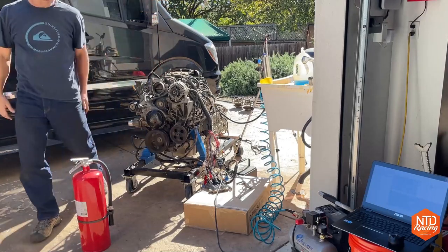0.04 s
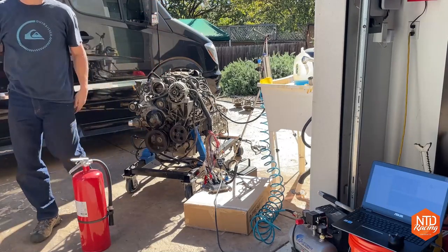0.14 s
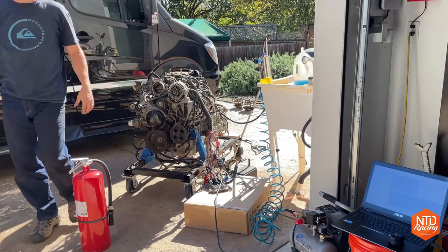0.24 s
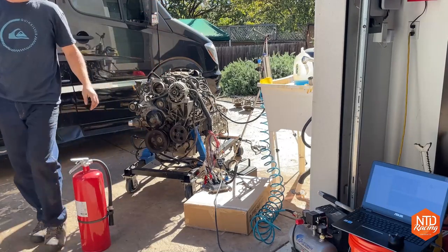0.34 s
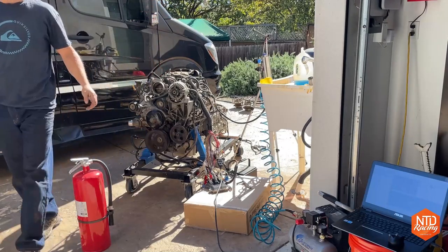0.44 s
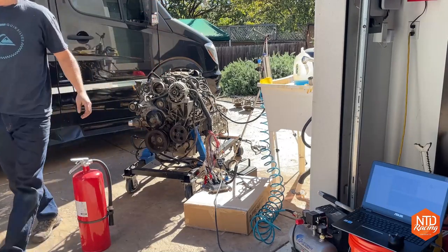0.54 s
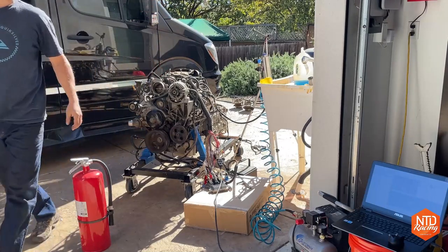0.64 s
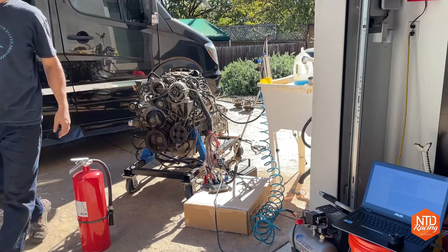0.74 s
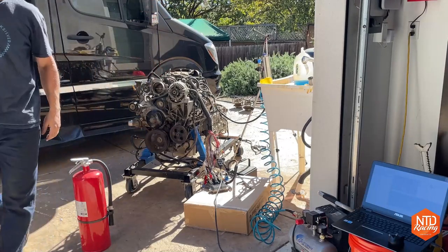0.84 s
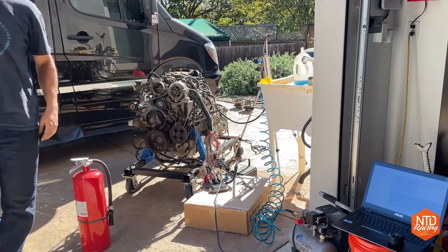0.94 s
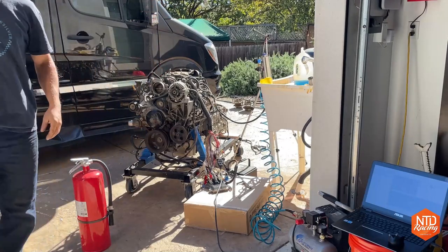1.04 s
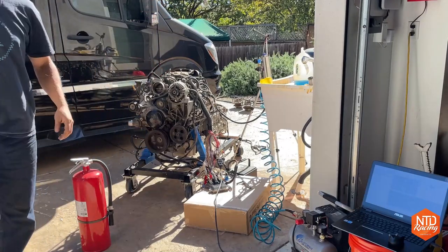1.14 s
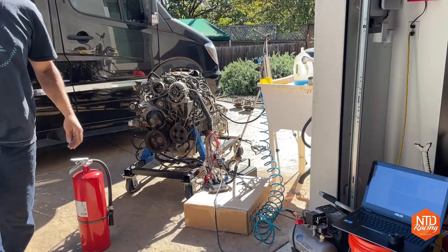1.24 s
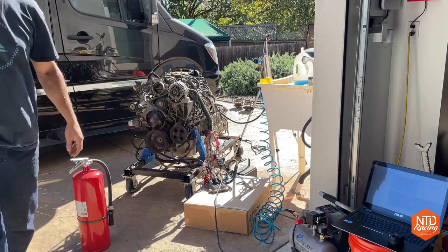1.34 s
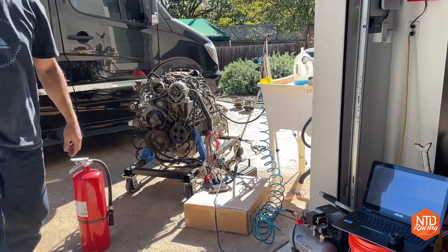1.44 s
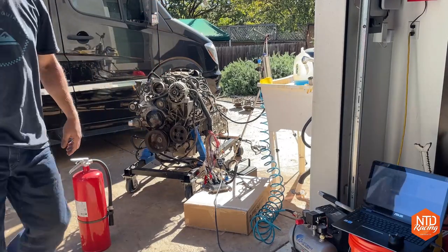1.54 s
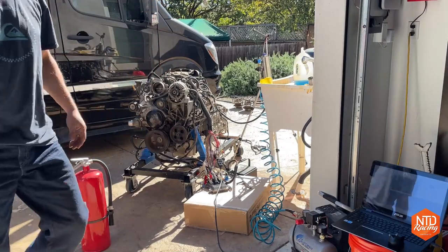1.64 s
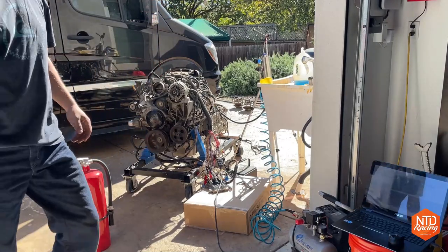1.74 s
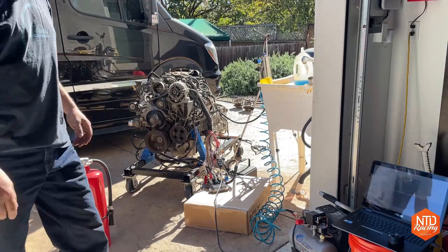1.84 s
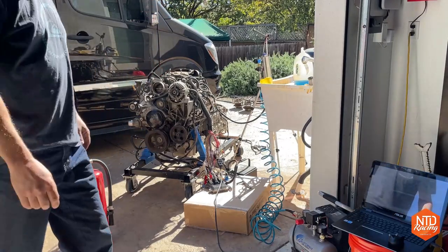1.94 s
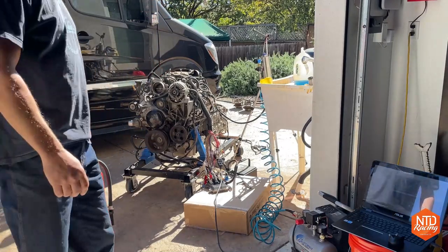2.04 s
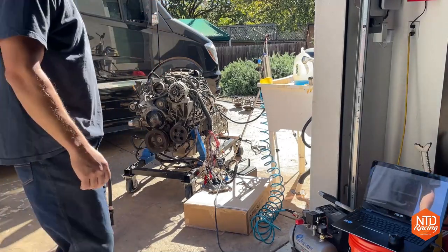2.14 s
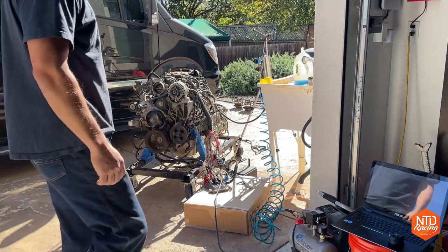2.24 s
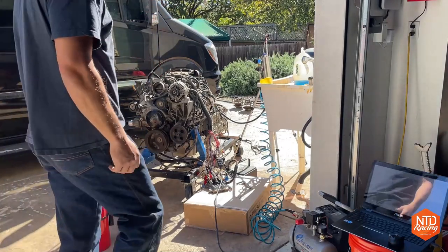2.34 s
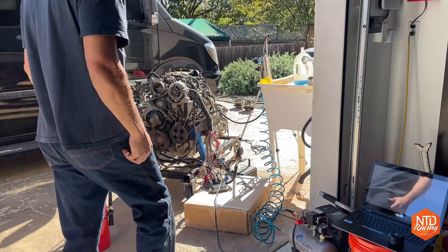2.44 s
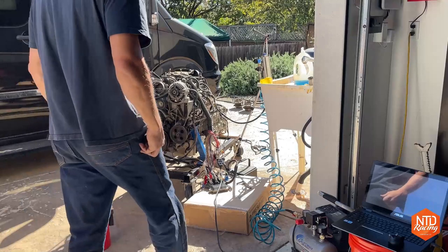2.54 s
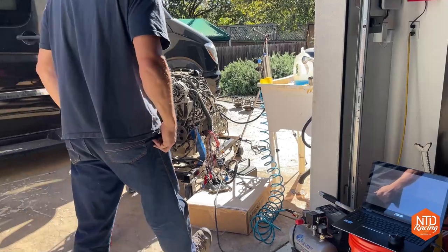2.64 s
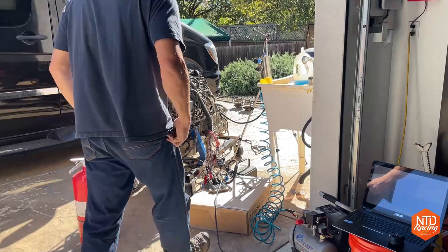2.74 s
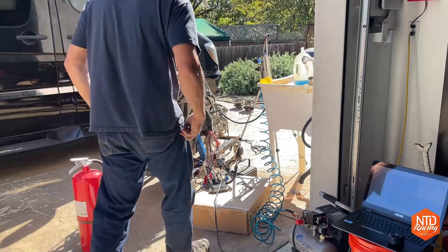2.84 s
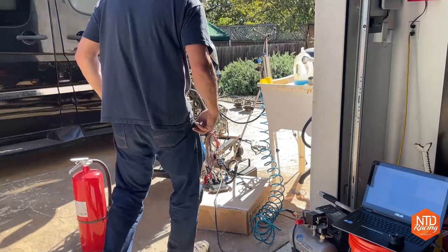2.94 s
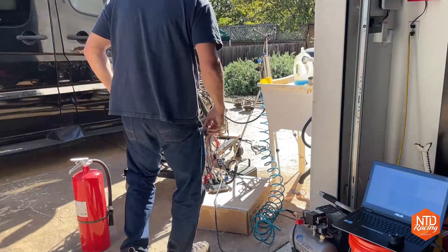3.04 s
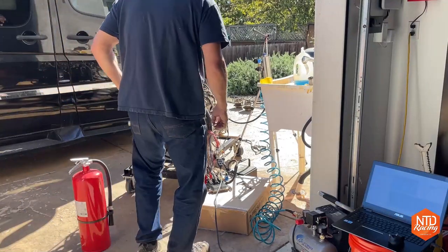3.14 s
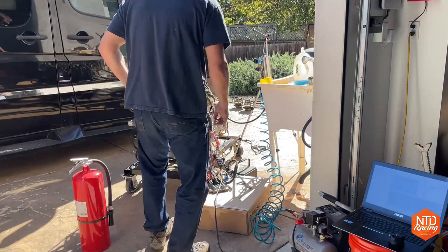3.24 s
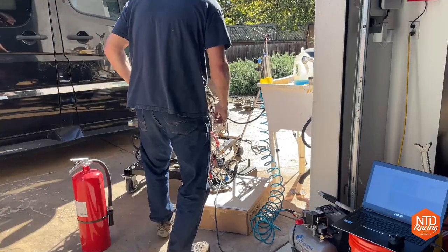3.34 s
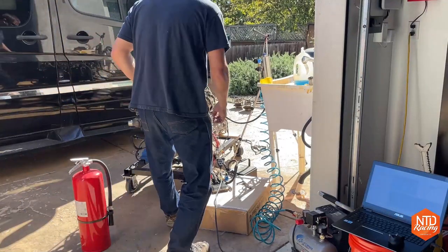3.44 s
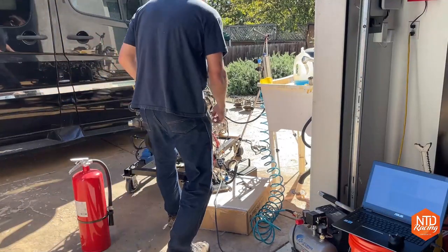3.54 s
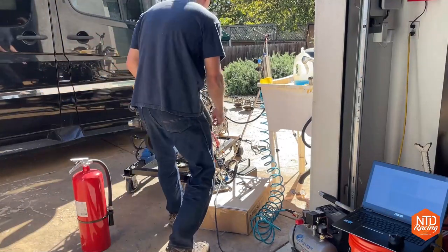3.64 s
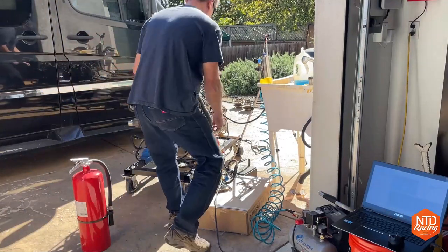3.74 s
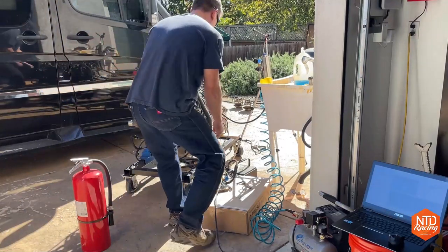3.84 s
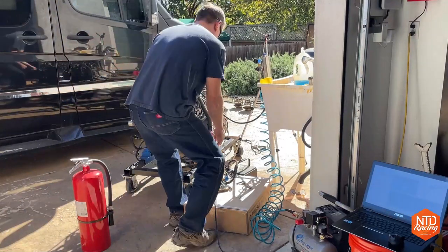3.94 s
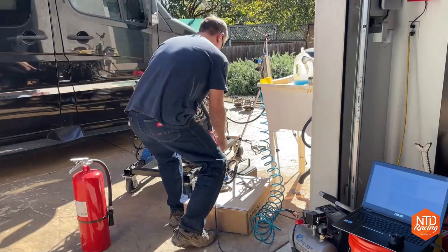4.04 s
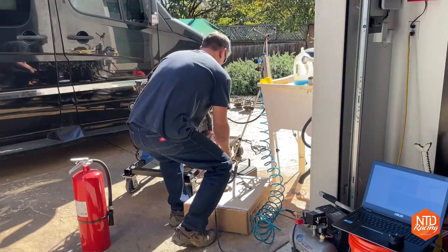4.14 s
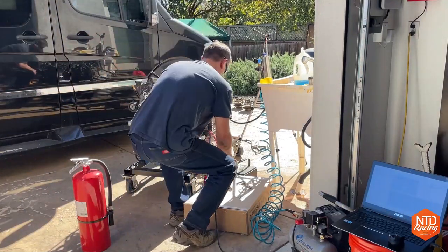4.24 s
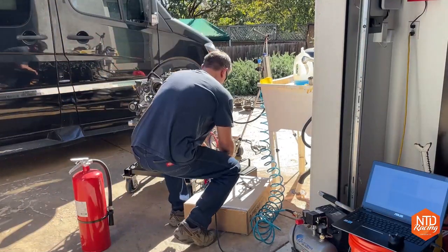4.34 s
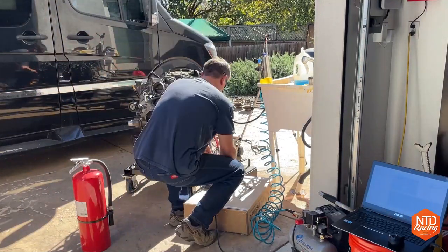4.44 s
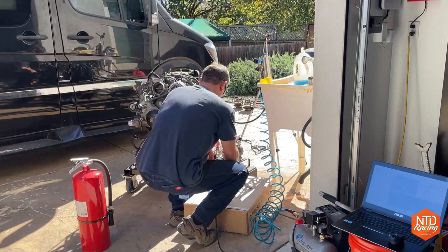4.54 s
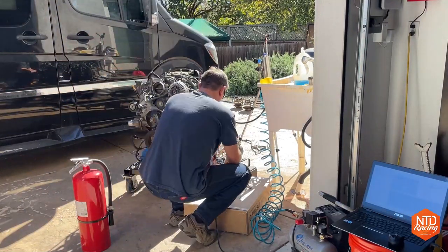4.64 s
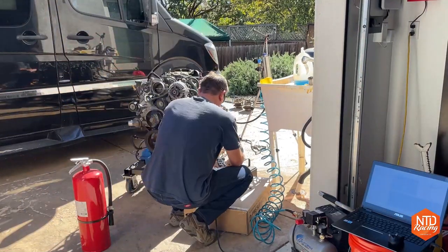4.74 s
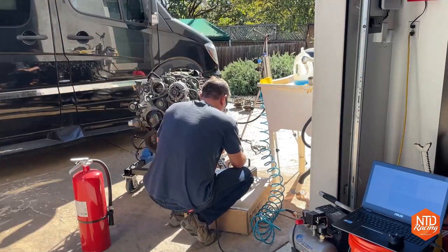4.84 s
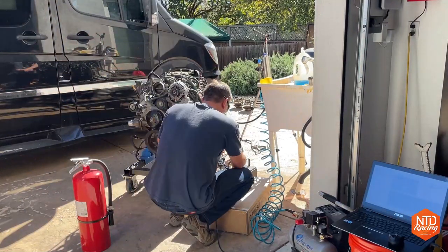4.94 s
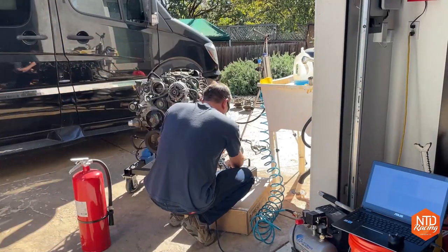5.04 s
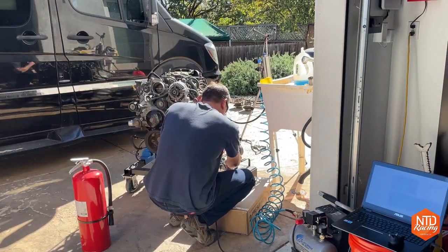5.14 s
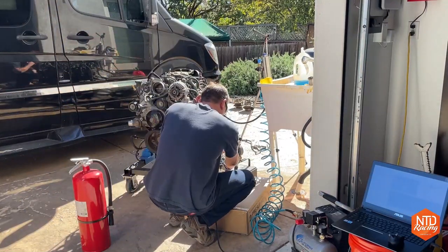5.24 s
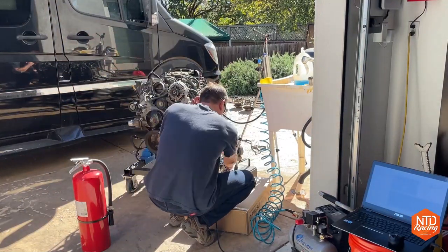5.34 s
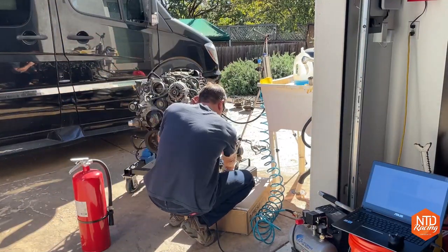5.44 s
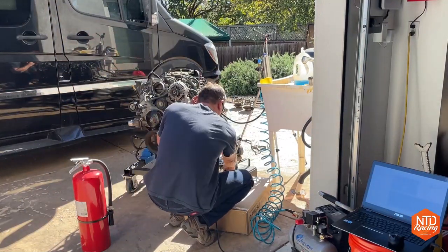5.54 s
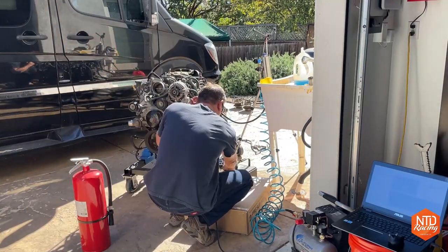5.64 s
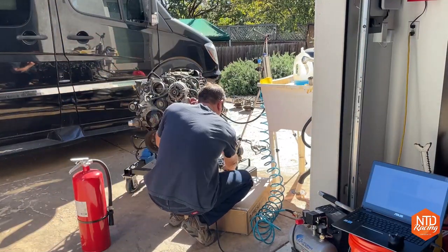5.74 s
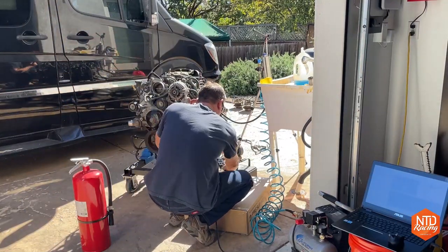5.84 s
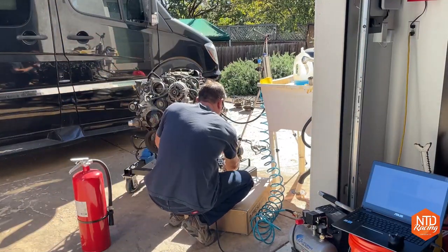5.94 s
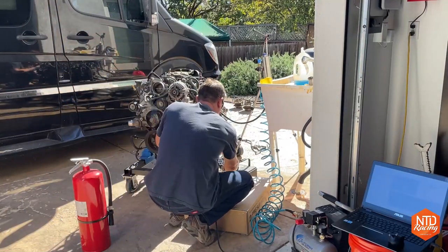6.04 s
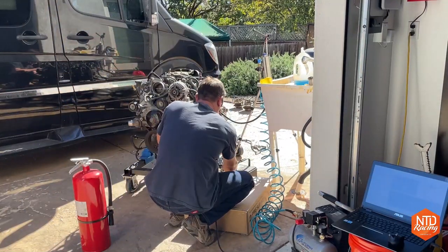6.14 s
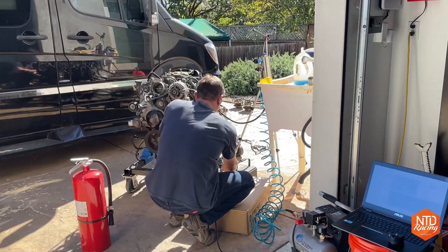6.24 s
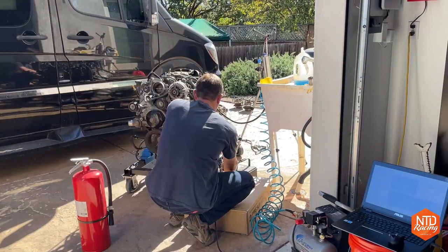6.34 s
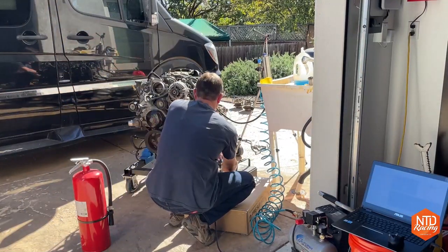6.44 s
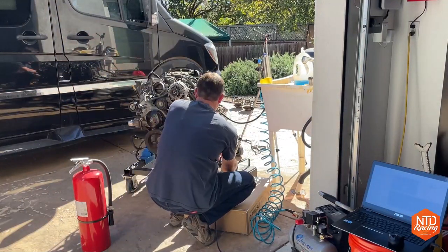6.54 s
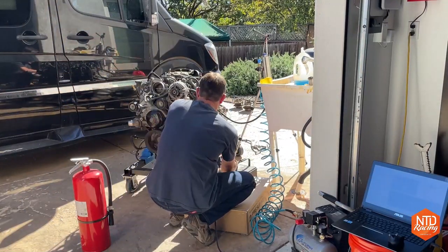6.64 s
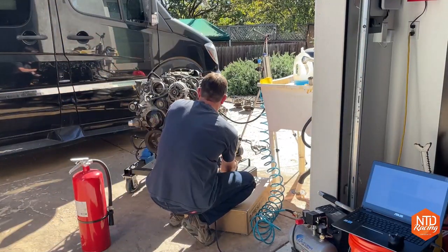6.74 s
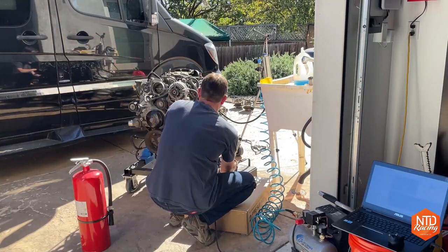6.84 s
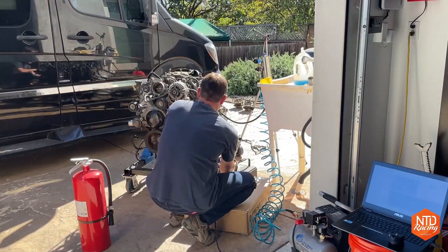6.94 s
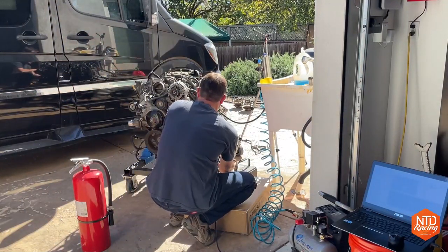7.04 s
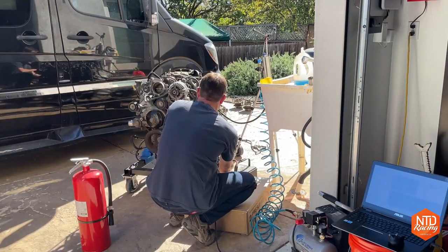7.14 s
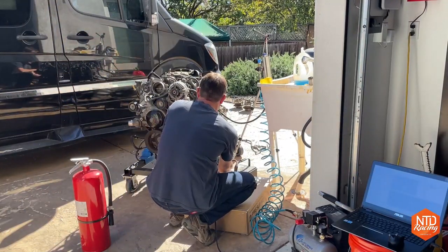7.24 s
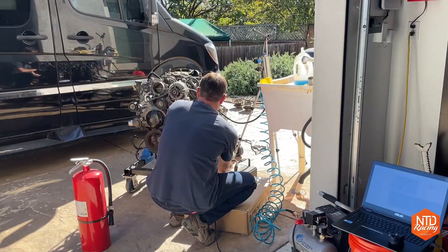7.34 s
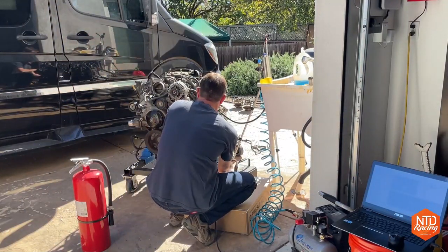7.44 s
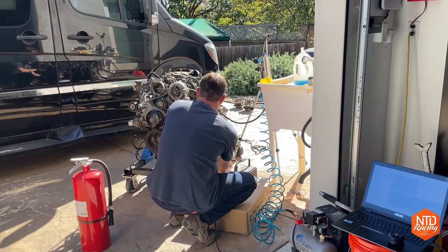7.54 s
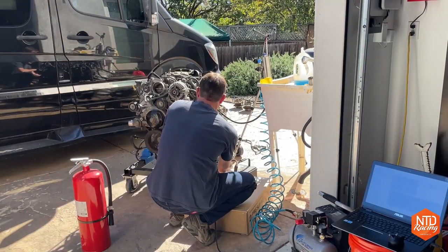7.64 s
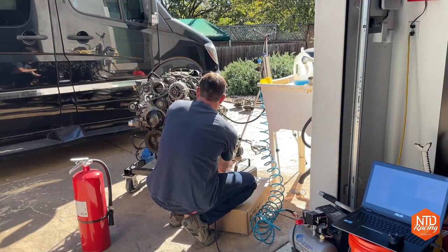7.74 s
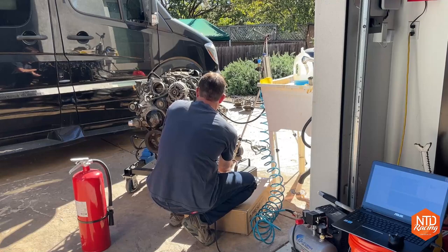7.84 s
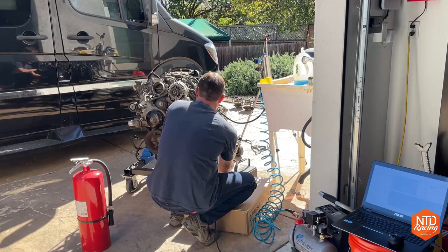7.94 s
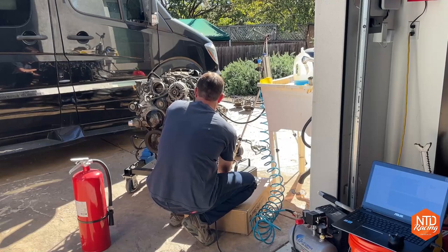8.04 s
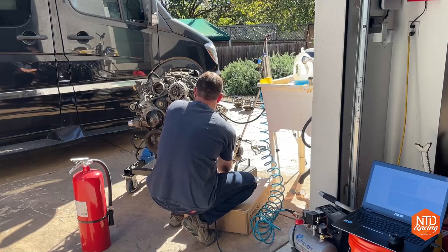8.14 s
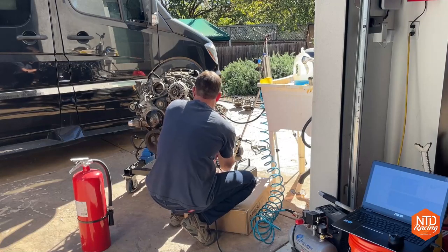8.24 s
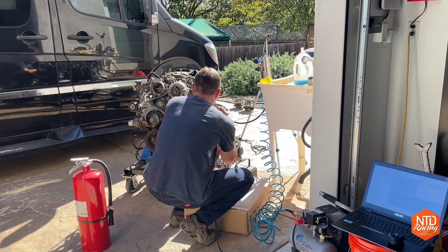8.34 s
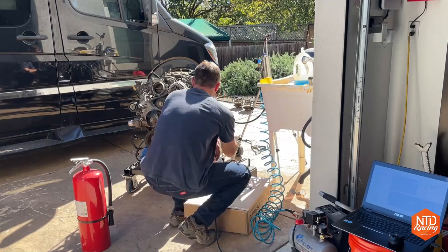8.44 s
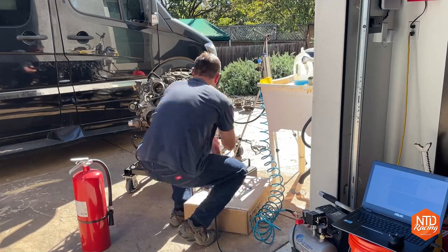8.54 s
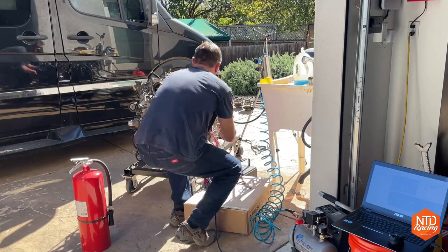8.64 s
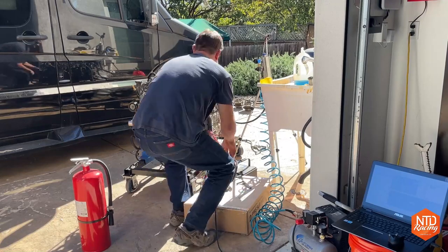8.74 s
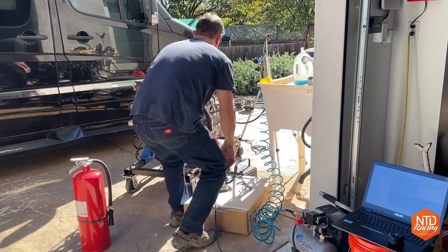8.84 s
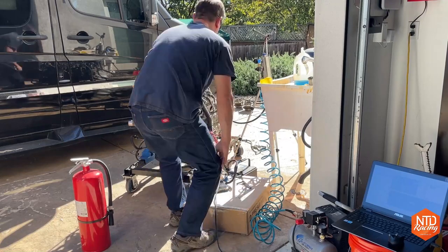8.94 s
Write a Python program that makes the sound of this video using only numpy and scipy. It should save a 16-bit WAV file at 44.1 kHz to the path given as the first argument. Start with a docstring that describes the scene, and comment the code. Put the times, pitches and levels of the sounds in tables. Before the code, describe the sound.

A rough eight-cylinder engine runs close by in an open workshop yard, wavering in speed with deep throbbing exhaust, raspy belt and chain noise, spitting gas and steel ticks. The crackling eases as the idle settles. Then it is switched off, pumping a few hollow gulps of air while valve gear knocks and a hiss dies. Quiet yard hum remains, with a faint shoe click. Near stereo pickup, little reverberation.

```python
"""Rough V8 on a stand, workshop yard

A bare V8 idles unevenly in front of a workshop door, into a pair of microphone ports.
Timed firings ring short open pipes and let out gas; one bank spits at a leak, tappets tick, pipes burble.
The ignition is cut: air pulses, hiss and valve-gear knocks run down with the slowing crank.
A thin hiss ends in a squeak, grit clicks underfoot, and the faint hum of the yard is left."""
import sys
import numpy as np
from scipy import signal
from scipy.fft import rfft, irfft, next_fast_len
from scipy.io import wavfile
from scipy.ndimage import map_coordinates

SR = 44100
rng = np.random.default_rng(int(sys.argv[2]) if len(sys.argv) > 2 else 0)


def waveform_to_disk(signal):
    """Save audio, clipped to [-1, 1], as 16-bit WAV at the path in sys.argv[1]."""
    frames = np.transpose(np.atleast_2d(signal))
    scaled = np.clip(frames, -1, 1) * 32767
    samples = np.round(scaled).astype(np.int16)
    wavfile.write(sys.argv[1], SR, samples)


N = 396459
T = np.arange(N) / SR  # seconds

# All level_db are relative: balance, microphone placement and echo follow. density_db is a spectral shape.
# the crankshaft hunting around its idle, while fired: time_s, speed_rpm
CRANK_SPEED = [(0.0, 848.4), (0.53, 926.6), (1.0, 803.4), (1.61, 966.0), (2.38, 846.6), (2.63, 913.8),
               (3.32, 896.0), (3.75, 911.2), (4.24, 885.9), (4.5, 917.6), (4.75, 881.7), (5.07, 920.2),
               (5.87, 850.3), (5.99, 894.1), (6.72, 867.2), (6.89, 823.2), (7.11, 884.9), (7.68, 885.0)]
# cylinders in firing order, relative strengths: thump_db, bark_db, spit_db
CYLINDER_STRENGTHS = [(2.5, 5, 4), (-1, 3, 2), (5, 2, -9), (0, .5, 1), (-6, -2, -12), (0, -1.5, -9),
                      (-2, 1.5, 2), (6.5, -1.5, -6)]
# loose tappets: place_in_cycle (0-1), level_db
LOOSE_TAPPETS = [(.31, 3.5), (0.675, 13), (.92, 16.5)]
# deep pipe resonances: centre_hz, width_hz, level_db
PIPE_RESONANCES = [(83, 51, -5.5), (145.2, 18.4, 6), (163.5, 35.7, 2), (201.8, 15.3, 5.5),
                   (234.8, 20.5, -3.5)]
# header resonances: centre_hz, width_hz, level_db
HEADER_RESONANCES = [(271, 26, -1), (334, 40, -5.5), (386.4, 28, -1), (439, 40, -6.5), (560, 197, -14)]
# tone of the pipes and of the headers: freq_hz, density_db
PIPE_TONE = [(25, -17), (75, -4.0), (260, -10.5), (2000, -23.5)]
HEADER_TONE = [(550, -5.5), (1000, -5.0), (4000, -32.0)]
# gas barking out of the ports: freq_hz, density_db
BARK_TONE = [(200, -8), (470, 1), (650, -2.5), (940, -8.5), (1015, -9), (1150, -12.5), (1500, -14),
             (1850, -33), (6000, -54)]
# the longer chuffs of every cycle: freq_hz, density_db
CHUFF_TONE = [(300, -5), (600, -8), (1050, 5), (1450, -8), (1900, -24), (5000, -37.5)]
# rasping belts: freq_hz, density_db
RASP_TONE = [(600, -15), (1500, 9.5), (2200, 4.5), (5200, 2), (6500, 0.5), (11500, -2.5), (13500, -4.5),
             (15700, -17.5)]
# spitting leak, ticks and knocks: freq_hz, density_db
SPIT_TONE = [(500, -9.5), (1500, 4), (2500, 4.5), (5000, 1), (6500, 5.5), (11500, 2), (13500, -5.5),
             (15700, -12.5)]
# voices following the running engine: idle_db, full_effort_db (added), freshly_started_db (added)
BOOM_LEVELS = (-26.5, 15.7, 3.8)
THUMP_LEVELS = (-19.5, 0.56, 1.5)
BARK_LEVELS = (-27, 6.6, 3.8)
RASP_LEVELS = (-37.5, 3.7, 1.94)
# spitting and ticking in the treble: time_s, level_db
TREBLE_LEVEL = [(0, -37.5), (.6, -51), (1.5, -35), (1.95, -45.5), (3.3, -42), (5.45, -52.5), (6.1, -46),
                (7.6, -47.5)]
# sharpest cracks at the leak: start_s, level_db
LEAK_CRACKS = [(0.1231, -23.5), (0.1446, -26.5), (0.2783, -16), (0.41, -18), (0.5262, -17), (0.6225, -19.5),
               (0.6799, -18), (0.8005, -15), (0.9941, -20.5), (1.0555, -15), (1.2283, -18), (1.245, -26),
               (1.3643, -10), (1.38, -24), (1.4476, -16.5), (1.458, -21), (1.4895, -19), (1.617, -25),
               (1.633, -17.5), (1.7135, -20), (1.761, -20), (2.138, -24), (2.2204, -18), (2.4184, -20),
               (2.8677, -21.5), (3.1018, -19.5), (3.47, -22.5), (3.482, -20.5), (6.257, -26.5),
               (6.289, -24.5), (7.2268, -26.5)]
# rising burbles in the pipes: sweep_start_s, sweep_length_s, level_db
PIPE_BURBLES = [(0.171, 0.023, -14.5), (0.264, 0.027, -20), (0.505, 0.032, -12), (0.533, 0.031, -13.5),
                (0.663, 0.033, -14.5), (0.701, 0.032, -12), (0.77, 0.05, -18), (0.812, 0.024, -10),
                (0.901, 0.034, -17), (1.015, 0.025, -15.5), (1.102, 0.027, -16.5), (1.631, 0.029, -11.5),
                (1.667, 0.024, -12), (1.718, 0.031, -11), (1.903, 0.031, -15), (2.056, 0.026, -12),
                (2.186, 0.032, -16.5), (2.692, 0.029, -14.5), (3.062, 0.041, -17.5), (4.29, 0.033, -12),
                (4.423, 0.026, -15), (4.711, 0.044, -20.5), (5.482, 0.06, -18.5), (5.669, 0.049, -15.5),
                (6.18, 0.03, -17.5), (6.461, 0.031, -13), (7.302, 0.02, -11), (7.423, 0.031, -12.5)]
# modes of the engine's steel, before detuning: pitch_hz, level_db
STEEL_MODES = [(560, 0), (985, 0), (1986, -1), (2309, -2), (2912, -2), (3795, -2), (4570, -5), (5685, 0),
               (6320, 4), (6900, 4)]
# air pumped through the pipes: freq_hz, density_db
PUMP_TONE = [(60, -12), (130, -2), (210, 4), (270, -5.5), (320, -11), (500, -21), (1000, -26), (3000, -54)]
# the engine rocking on its stand: freq_hz, density_db
ROCKING_TONE = [(25, -34.0), (45, 5.0), (85, 7.0), (140, -27.5)]
# air drawn past the closed throttle: freq_hz, density_db
THROTTLE_TONE = [(500, -14), (1500, -12), (4500, -5), (7000, -1), (11500, 8), (13500, -8), (15700, -38)]
# voices dying after the spark is cut: level_db, hold_s, fall_db_per_s
PUMP_DECAY = (-17.5, 0.28, 63)
ROCKING_DECAY = (-20.5, 0.018, 40.5)
HISS_DECAY = (-32.5, 0.14, 80)
# valve gear knocking as the crank slows: start_s, level_db, pitch_hz (before detuning)
VALVE_KNOCKS = [(7.6755, -25, 5860), (7.7308, -19, 6600), (7.777, -18, 6300), (7.848, -18.5, 7000),
                (7.9782, -23, 2910), (8.03, -22.5, 6210), (8.08, -35, 5560), (8.1663, -34.5, 1300)]
# the thin falling squeak: start_s, length_s, from_hz, to_hz, level_db
LAST_SQUEAK = (8.472, .03, 14800, 10200, -51)
# gulps of air from the last full strokes: start_s, level_db
AIR_GULPS = [(7.707, -5.5), (7.78, -7), (7.884, -18), (7.912, -11.5)]
# light click underfoot as the mechanic gets up: start_s, level_db
FOOT_CLICKS = [(8.969, -33.5)]
# grit under a shoe: freq_hz, density_db
GRIT_TONE = [(200, -12), (800, 9), (3500, 0), (7000, -29)]
# quiet of the yard: freq_hz, density_db
YARD_TONE = [(25, -20), (42, -9.5), (85, -0.5), (133, -9.5), (280, -18), (950, -21.5), (2600, -45),
             (14000, -67.5)]
# hums in the yard: pitch_hz, level_db
YARD_HUMS = [(48.5, -56), (59.6, -50.5)]
# echo from walls and parked van: freq_hz, level_db (against the direct sound)
YARD_ECHO = [(60, -23), (130, -17), (280, -9), (550, -1.5), (3000, -1), (5500, -3), (8000, -8)]
# the two microphone ports: freq_hz, left_lead_rad
PORT_PHASES = [(1500, 0), (4500, .6), (6100, -.2), (8100, -3.14), (11700, -6.28), (15000, -9.4)]
# balance of the ports: freq_hz, left_minus_right_db
PORT_BALANCE = [(250, -0.64), (1000, 0.5), (3500, 3.0), (8000, 0.0)]

IGNITION_OFF_S, COAST_S, COAST_BEND = 7.68, .67, 1.35  # the crank stops COAST_S after the cut
IDLE_RPM, IDLE_SAG_RPM_PER_S = 902.3, 1.3  # reference idle, sinking as the engine warms
SURGE_RPM, LEAST_EFFORT = 100, -0.42  # rise above idle that is full effort (1); floor of the effort
EFFORT_LEAD_S, BOOM_LEAD_S = 0.13, 0.032  # loudness leads the crank speed, the boom by less
SETTLE_S = 2.4  # the freshly started engine calms down over this time
THROB_DB, THROB_SWING_DB, THROB_PLACE = -9.5, 4.5, 0.19  # level, swell, where in the cycle it peaks (0-1)
WAVER_S = .0011  # scale of the pipes' early and late drift
ALIKE_SHARE = .45  # share of the gas power that repeats every cycle
CHUFF_DB = -36.8
BURBLE_FROM_HZ, BURBLE_TO_HZ = 235, 678.5  # sweep over sweep_length_s, continued a little at both ends
STEEL_RING_S = .012  # ring time near 2 kHz
RATTLES_PER_S, RATTLE_DB = 100, 5  # light valve-gear taps, ahead of the hiss fade
LINGER_DB, LINGER_END_S = -61.5, 8.5
AMBIENCE_DB = -49.5
TOP_HZ = 15750  # upper edge of the sound


def amp(db):
    """Decibels to gain."""
    return 10 ** (np.asarray(db) / 20)


def unit(x):
    """Scale to rms 1."""
    return x / np.sqrt(np.mean(x ** 2) + 1e-20)


def along(points, hz):
    """Read (freq_hz, value) points on a log axis."""
    f, v = np.transpose(points)
    return np.interp(np.log(hz + 1), np.log(f + 1), v)


def curves(rows):
    """One value per sample for each column after the time."""
    s, *cols = np.transpose(rows)
    return [np.interp(T, s, c) for c in cols]


def wobble(rate):
    """A smooth random curve, rate knots a second."""
    return map_coordinates(rng.standard_normal(int(N * rate / SR) + 4), [T * rate])


def scatter(shape):
    """Bounded chance of rms 1, so that no one blow stands far out."""
    return np.sqrt(3) * rng.uniform(-1, 1, shape)


def filtered(x, response):
    """x through a complex response of frequency."""
    m = next_fast_len(N + SR // 2)
    return irfft(rfft(x, m) * response(np.fft.rfftfreq(m, 1 / SR)), m)[..., :N]


def coloured(x, spectrum):
    """x shaped by a (freq_hz, density_db) spectrum, at rms 1."""
    return unit(filtered(x, lambda hz: amp(along(spectrum, hz))))


def noise(spectrum):
    """Fresh coloured noise of rms 1."""
    return coloured(rng.standard_normal(N), spectrum)


def resonate(x, modes):
    """x through parallel resonances of alternating sign, at rms 1."""
    def response(f):
        total = 0
        for k, (centre, width, db) in enumerate(modes):
            damping = 1j * f * width
            total = total + (-1) ** k * amp(db) * damping / (centre * centre - f * f + damping)
        return total

    return unit(filtered(x, response))


def impulses(times, db):
    """One impulse of the given level at each time."""
    return np.bincount(np.clip(np.round(times * SR).astype(int), 0, N - 1), amp(db), N)


def puffs(times, db, rise, decay):
    """An envelope that opens and dies away at each time (rise and decay in s)."""
    t = T[:SR // 2]
    shape = (1 - np.exp(-t / rise)) * np.exp(-t / decay)
    return signal.fftconvolve(impulses(times, db), shape / shape.max())[:N]


def ringing(times, db, detune=.018):
    """Each blow rings the modes of the steel in a mix of its own; high modes die sooner."""
    t, out = T[:SR // 12], np.zeros(N + SR)
    hz, level_db = np.transpose(STEEL_MODES)
    fades = np.exp(-np.outer(np.sqrt(hz / 2000), t) / STEEL_RING_S)
    draws = rng.standard_normal((len(times), 2, len(hz)))
    for s, gain, (mix, tuning) in zip(times, amp(db), draws):
        modes = fades * np.sin(2 * np.pi * np.outer(hz * (1 + detune * tuning), t))
        out[int(s * SR):][:len(t)] += gain * unit(mix * amp(level_db)) @ modes / np.sqrt(len(hz))
    return out[:N]


def crank_rpm():
    """The crank hunts while it is fired, then friction brings it to rest."""
    spent = np.clip((T - IGNITION_OFF_S) / COAST_S, 0, 1)
    return curves(CRANK_SPEED)[0] * (1 - spent) ** COAST_BEND


def cycles():
    """Four-stroke cycles turned so far: one for every two turns of the crank."""
    return np.cumsum(crank_rpm()) / (120 * SR) + .12


def firings(cycle):
    """When each exhaust valve opens, and that cylinder's row of strengths."""
    count = len(CYLINDER_STRENGTHS)
    k = np.arange(1, int(cycle[-1] * count))
    return np.interp(k / count, cycle, T), np.array(CYLINDER_STRENGTHS)[k % count].T


def running_db(law, lead=EFFORT_LEAD_S):
    """Level of one voice: louder with effort, and louder while the engine is freshly started."""
    idle_db, effort_db, fresh_db = law
    coming_rpm = np.interp(T + lead, *np.transpose(CRANK_SPEED))
    effort = (coming_rpm - IDLE_RPM + IDLE_SAG_RPM_PER_S * T) / SURGE_RPM
    fresh = np.exp(-(T / SETTLE_S) ** 2)
    return idle_db + effort_db * np.maximum(effort, LEAST_EFFORT) + fresh_db * fresh


def background():
    """The quiet of the yard, with two low hums beating against each other."""
    hum = 0
    for hz, db in YARD_HUMS:
        tone = np.sqrt(2) * np.sin(2 * np.pi * (hz * T + rng.random()))
        hum = hum + amp(db + wobble(2.7)) * tone
    return hum + amp(AMBIENCE_DB) * noise(YARD_TONE)


def gas_flow(cycle, spectrum):
    """Gas rushing through the ports: part of its pattern repeats every cycle, the rest is turbulence."""
    pattern = rng.standard_normal(2048)
    looped = map_coordinates(pattern, [cycle % 1 * len(pattern)], mode="grid-wrap")
    repeated = coloured(looped, spectrum)
    return np.sqrt(ALIKE_SHARE) * repeated + np.sqrt(1 - ALIKE_SHARE) * noise(spectrum)


def wavering(x, rate=7):
    """The pitch of x wanders a little, as the gas in the pipes runs hotter and cooler."""
    return map_coordinates(x, [(T + WAVER_S * wobble(rate)) * SR], mode="nearest")


def blow(times, db, rough):
    """A pressure pulse for each firing, with its swirl of turbulent gas."""
    swirl = unit(puffs(times, db, rise=0.0014, decay=0.013) * rng.standard_normal(N))
    return unit(impulses(times, db)) + rough * swirl


def exhaust(cycle, scatter_db=2.2, jitter_s=0.0005, pipe_lag_s=0.011, header_lag_s=0.0075):
    """Each firing thumps the pipes, rings the headers and lets out a turbulent bark of gas."""
    times, (thump_db, bark_db, _) = firings(cycle)
    luck = scatter((len(times), 4)).T
    times = times + jitter_s * luck[0]
    pipe_blow = blow(times + pipe_lag_s, thump_db + scatter_db * luck[1], rough=0.55)
    header_blow = blow(times + header_lag_s, .5 * bark_db + scatter_db * luck[2], rough=1.0)
    pipes = coloured(resonate(pipe_blow, PIPE_RESONANCES), PIPE_TONE)
    headers = coloured(resonate(header_blow, HEADER_RESONANCES), HEADER_TONE)
    body = wavering(amp(0.4) * pipes + amp(-3.5) * headers)
    bark_puffs = unit(puffs(times, bark_db + scatter_db * luck[3], rise=0.0018, decay=0.0067))
    bark = bark_puffs * gas_flow(cycle, BARK_TONE)
    return amp(running_db(THUMP_LEVELS)) * body + amp(running_db(BARK_LEVELS)) * bark


def boom_and_throb(cycle):
    """Surges boom at the firing rate; its octave throbs, swelling once in each cycle."""
    firing_phase = 2 * np.pi * len(CYLINDER_STRENGTHS) * cycle
    boom = np.sqrt(2) * np.sin(firing_phase)
    swell_db = THROB_DB + THROB_SWING_DB * np.cos(2 * np.pi * (cycle - THROB_PLACE)) + 3.6 * wobble(7.4)
    throb = amp(swell_db) * np.sin(2 * firing_phase)
    boom_db = running_db(BOOM_LEVELS, lead=BOOM_LEAD_S)
    return amp(running_db(THUMP_LEVELS)) * throb + amp(boom_db) * boom


def chuffs(cycle, second_place=.4, second_db=-5, grows_db_per_s=1.5):
    """Two cylinders blow longer than the rest, more so as the engine warms, which gives the idle its lope."""
    turns = np.arange(1, int(cycle[-1]))
    times = np.interp(np.concatenate([turns, turns + second_place]), cycle, T)
    db = np.repeat([0, second_db], len(turns)) + grows_db_per_s * times + 1.8 * scatter(len(times))
    opening = unit(puffs(times, db, rise=0.0033, decay=0.017))
    return amp(CHUFF_DB) * opening * gas_flow(cycle, CHUFF_TONE)


def chain(count=900, order=3, lowest_hz=1800, ring_s=0.0055, scatter_db=2):
    """The timing chain strikes at loose moments, and every strike rings a few partials of its own."""
    when, strength, *pitches = rng.random((count, 2 + order)).T
    t = T[:SR // 50]
    partials = 0
    for pitch in pitches:
        hz = lowest_hz * 2 ** (2 * pitch)  # within two octaves
        partials = partials + np.sin(2 * np.pi * np.outer(hz, t))
    gains = amp(-scatter_db * np.log(strength + .01))
    rings = gains[:, None] * np.exp(-t / ring_s) * partials
    places = (when * N).astype(int)[:, None] + np.arange(len(t))
    return unit(np.bincount(places.ravel(), rings.ravel(), N)[:N])


def belts_and_chain():
    """Belts rasp as flickering noise and the timing chain rattles, both following the engine's effort."""
    rasp = amp(-5.0) * noise(RASP_TONE) + amp(-6.5) * chain()
    return amp(running_db(RASP_LEVELS) + 2.24 * wobble(30)) * rasp


def leak(cycle, scatter_db=4):
    """One bank spits gas at a leak in short puffs of noise, one for each firing."""
    times, (_, _, spit_db) = firings(cycle)
    spits = unit(puffs(times, spit_db + scatter_db * scatter(len(times)), rise=0.00024, decay=0.0046))
    return amp(4.0) * spits * noise(SPIT_TONE)


def tappets(cycle, scatter_db=4):
    """Slack tappets tick at fixed places in the cycle and ring the steel."""
    turns = np.arange(int(cycle[-1]))
    times = np.concatenate([np.interp(turns + place, cycle, T) for place, _ in LOOSE_TAPPETS])
    db = np.repeat([db for _, db in LOOSE_TAPPETS], len(turns)) + scatter_db * scatter(len(times))
    ticks = unit(puffs(times, db, rise=.0005, decay=0.0056)) * noise(SPIT_TONE)
    return amp(-2.5) * (ticks + .5 * unit(ringing(times, db)))


def top_end(cycle):
    """The treble of the engine: belts and chain, with leak and tappets on a level curve of their own."""
    treble = amp(curves(TREBLE_LEVEL)[0])
    return belts_and_chain() + treble * (leak(cycle) + tappets(cycle))


def cracks(snap_db=-3.5, ring_db=-7, pop_db=-7):
    """Now and then the leak fires with a pop and a sharp crack that rings the steel around it."""
    s, db = np.transpose(LEAK_CRACKS)
    snap = puffs(s, db, rise=0.0006, decay=0.0038)
    gas = amp(snap_db) * noise(SPIT_TONE) + amp(pop_db) * noise(CHUFF_TONE)
    return snap * gas + ringing(s, db + ring_db)


def burbles(gain_db=.5, rough=.45):
    """The pipes burble: each is a short, rough whoop that sweeps quickly upward."""
    out = np.zeros(N + SR)
    for s, length, db in PIPE_BURBLES:
        u = np.arange(-.3, 1.2, 1 / (SR * length))  # the sweep is heard a little beyond 0-1
        hz = BURBLE_FROM_HZ * (BURBLE_TO_HZ / BURBLE_FROM_HZ) ** u
        tone = np.sin(2 * np.pi * (np.cumsum(hz) / SR + rng.random()))
        whoop = signal.windows.tukey(len(u), .7) * tone
        out[int((s + u[0] * length) * SR):][:len(u)] += amp(db) * whoop
    return amp(gain_db) * out[:N] * (1 + rough * wobble(250))


def dying_db(fade):
    """Level of one voice after the spark is cut: it holds, then falls steadily."""
    db, hold, fall = fade
    return db - fall * np.maximum(T - IGNITION_OFF_S - hold, 0)


def pumped_air(cycle, turbulence=0.72, rush=0.41):
    """Pistons without spark push pulses of turbulent air through the pipes, ever slower."""
    times, _ = firings(cycle)
    even_db = np.zeros(len(times))
    strokes = unit(puffs(times, even_db, rise=0.004, decay=0.041))
    rushing = (turbulence * strokes + rush) * rng.standard_normal(N)
    return coloured(amp(-5) * unit(impulses(times, even_db)) + rushing, PUMP_TONE)


def throttle_hiss():
    """Air hisses past the closed throttle while slack valve gear taps lightly on the steel."""
    taps = IGNITION_OFF_S + COAST_S * rng.random(int(RATTLES_PER_S * COAST_S))
    rattle = ringing(taps, RATTLE_DB + 2 * scatter(len(taps)))
    return amp(3.8 * wobble(80) - 1.5) * noise(THROTTLE_TONE) + rattle


def coasting(cycle):
    """Without spark the pistons only pump air, and the engine rocks on its stand as low noise."""
    air = amp(dying_db(PUMP_DECAY)) * pumped_air(cycle)
    rocking = amp(dying_db(ROCKING_DECAY)) * noise(ROCKING_TONE)
    hiss = amp(dying_db(HISS_DECAY)) * throttle_hiss()
    turning = np.interp(T, [IGNITION_OFF_S - .01, IGNITION_OFF_S, 8.3, 8.55], [0, 1, 1, 0])
    return turning * (air + rocking + hiss)


def strikes(rows, ring_s):
    """Each blow rings a close pair of partials near its own pitch."""
    t, out = T[:SR // 8], np.zeros(N + SR)
    for s, db, hz in rows:
        pair = sum(np.sin(2 * np.pi * hz * (1 + 0.013 * rng.standard_normal()) * t) for _ in range(2))
        out[int(s * SR):][:len(t)] += amp(db) * np.exp(-t / ring_s) * pair
    return out[:N]


def clatter(ring_s=0.007, ring_db=-7, knock_db=-11, note_db=-11):
    """The valve gear knocks as the crank slows, and the steel rings after each knock."""
    s, db, _ = np.transpose(VALVE_KNOCKS)
    knock = puffs(s, db + knock_db, rise=0.000534, decay=ring_s) * noise(SPIT_TONE)
    return knock + ringing(s, db + ring_db) + amp(note_db) * strikes(VALVE_KNOCKS, ring_s)


def lingering():
    """A thin hiss from the cut onward outlasts the crank; a falling squeak comes at its end."""
    gate_s = [IGNITION_OFF_S, IGNITION_OFF_S + .1, LINGER_END_S - .04, LINGER_END_S + 0.077]
    gate = np.interp(T, gate_s, [0, 1, 1, 0])
    s, length, from_hz, to_hz, db = LAST_SQUEAK
    u = np.clip((T - s) / length, 0, 1)
    hz = from_hz + (to_hz - from_hz) * u
    squeak = np.sin(np.pi * u) * np.sin(2 * np.pi * np.cumsum(hz) / SR)
    return amp(LINGER_DB) * gate * noise(RASP_TONE) + amp(db) * squeak


def gulps(pipe_hz=205):
    """The last full strokes push out single gulps of air, which ring the pipes."""
    s, db = np.transpose(AIR_GULPS)
    pipe = np.sin(2 * np.pi * pipe_hz * T + .5 * wobble(40))
    return puffs(s, db, rise=0.0027, decay=0.0076) * pipe


def steps():
    """Grit clicks under a shoe once the engine is still: a very short puff of noise."""
    s, db = np.transpose(FOOT_CLICKS)
    return amp(-7.5) * puffs(s, db, rise=.0005, decay=0.0018) * noise(GRIT_TONE)


def yard(x, t60=0.4):
    """The direct sound reaches two ports; walls answer differently at each, and the answer drifts."""
    t = T[:SR // 4]
    fade = amp(-60 * t / t60) * (t > .004)
    hop = SR // 12
    padded, wet = np.pad(x, (hop, 2 * hop)), np.zeros((2, N + 2 * SR))
    for start in range(0, N + hop, hop):  # a fresh echo for each overlapping stretch
        tail = rng.standard_normal((2, len(t))) * fade / np.linalg.norm(fade)
        stretch = padded[start:start + 2 * hop] * signal.windows.cosine(2 * hop)
        answer = signal.fftconvolve([stretch], tail, axes=1)
        wet[:, start:start + answer.shape[1]] += answer
    direct = filtered(x, lambda f: np.exp(.5j * np.outer([1, -1], along(PORT_PHASES, f))))
    echo = filtered(wet[:, hop:hop + N], lambda f: amp(along(YARD_ECHO, f)))
    return filtered(direct + echo, lambda f: amp(np.outer([.5, -.5], along(PORT_BALANCE, f))))


def scene():
    """The engine runs until the spark is cut, then coasts down into the quiet of the yard."""
    cycle = cycles()
    burning = np.interp(T, [IGNITION_OFF_S - .02, IGNITION_OFF_S + 0.05], [1, 0])
    fired = burning * (exhaust(cycle) + boom_and_throb(cycle) + chuffs(cycle) + top_end(cycle))
    running = fired + cracks() + burbles()
    stopping = coasting(cycle) + clatter() + gulps()
    return yard(amp(-0.93) * (running + stopping) + lingering() + steps() + background())


def record(dry, knee=6):
    """Rounds off the highest peaks and keeps nothing above TOP_HZ."""
    rounded = dry / (1 + np.abs(dry) ** knee) ** (1 / knee)
    return filtered(rounded, lambda hz: hz < TOP_HZ)


dry = scene()
out = record(dry)
waveform_to_disk(out)
```